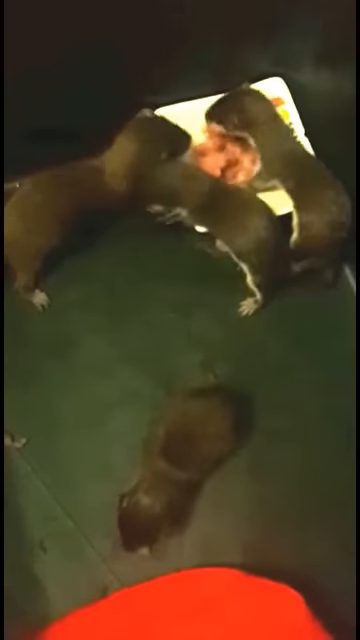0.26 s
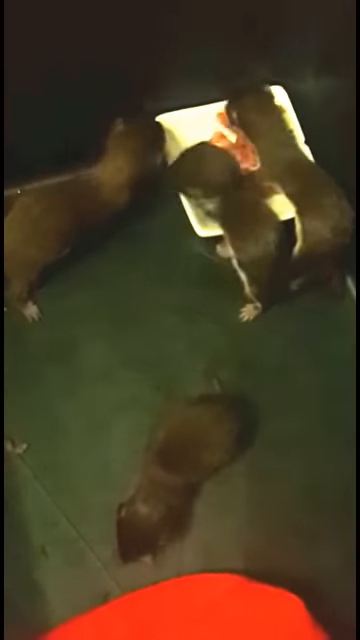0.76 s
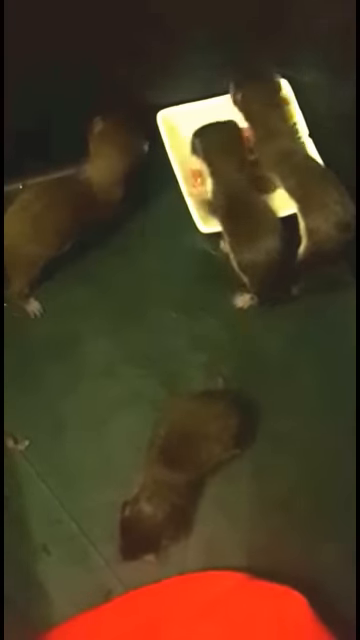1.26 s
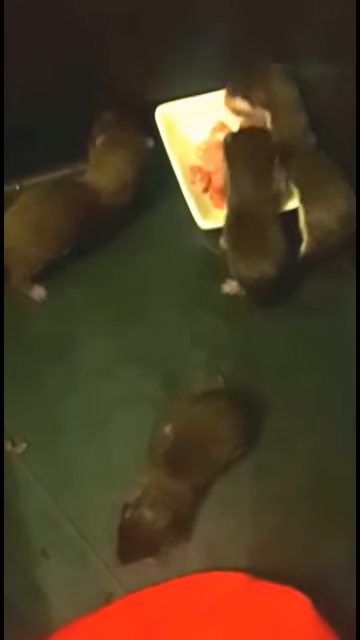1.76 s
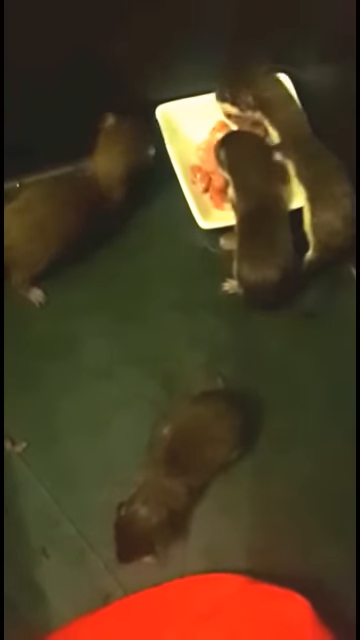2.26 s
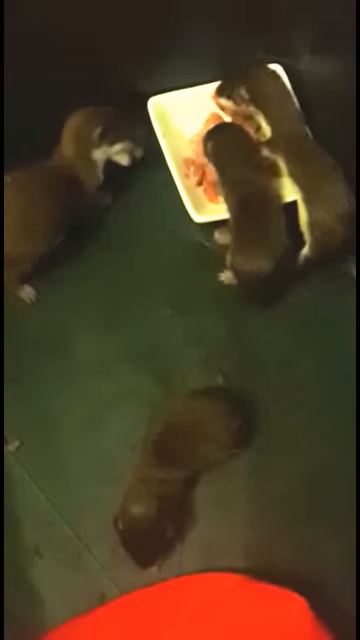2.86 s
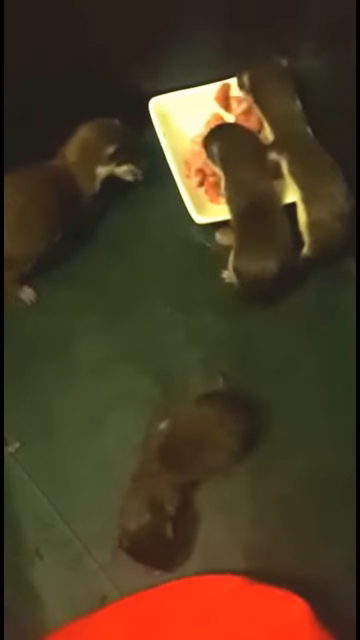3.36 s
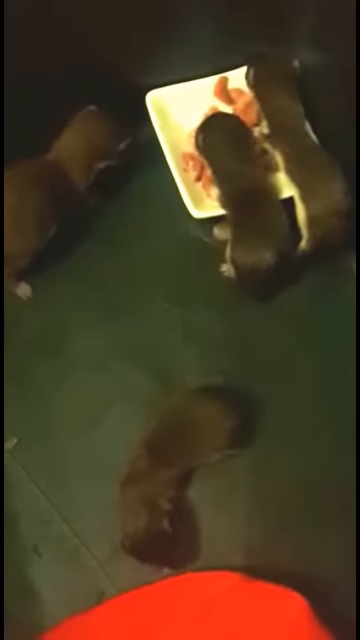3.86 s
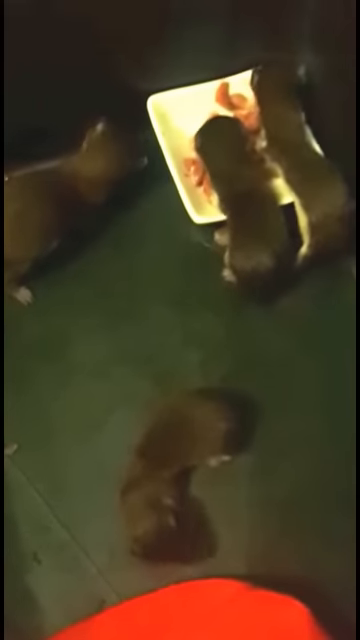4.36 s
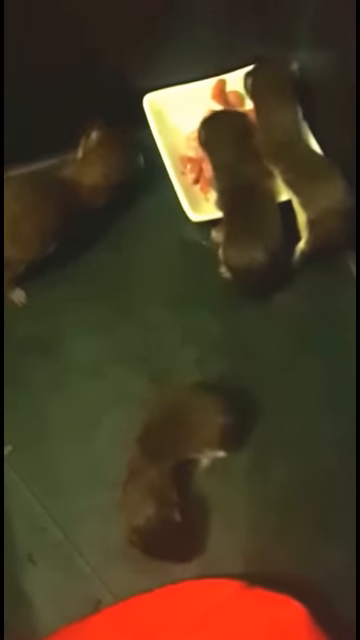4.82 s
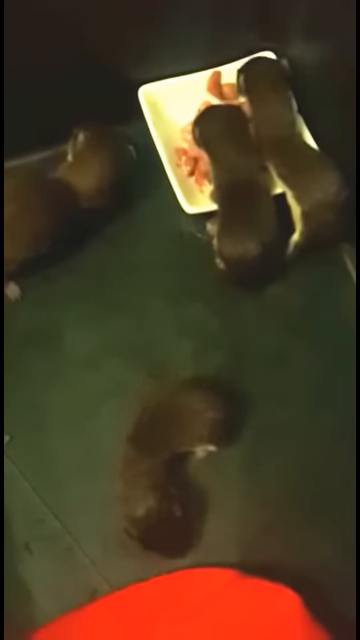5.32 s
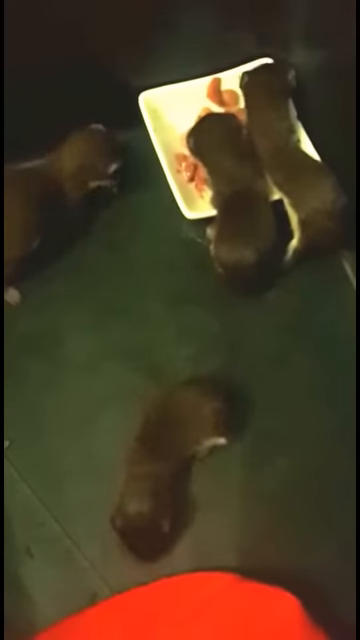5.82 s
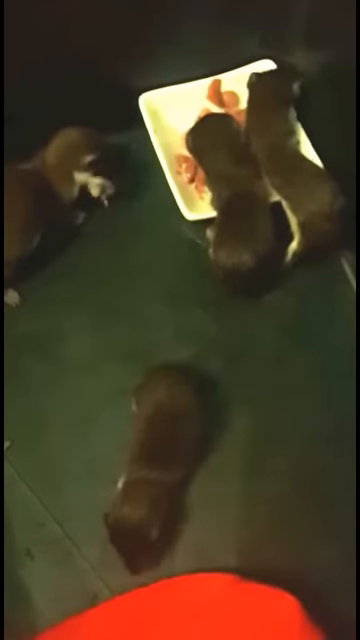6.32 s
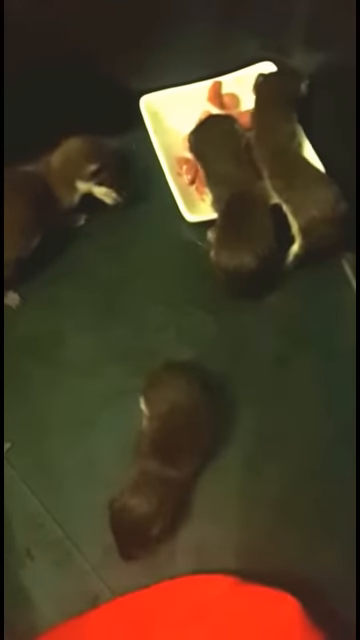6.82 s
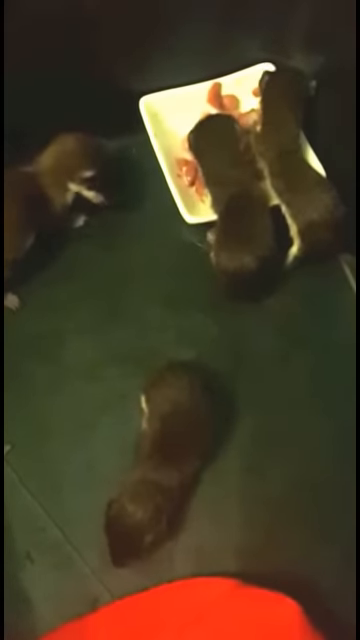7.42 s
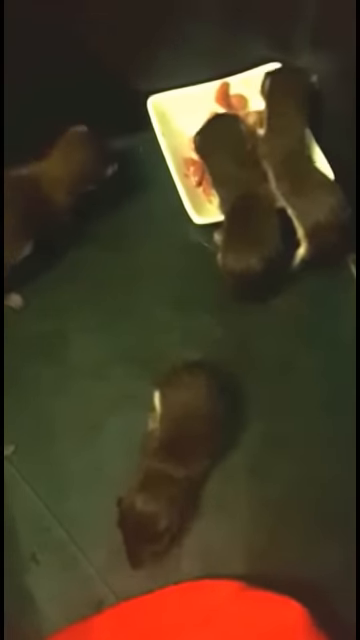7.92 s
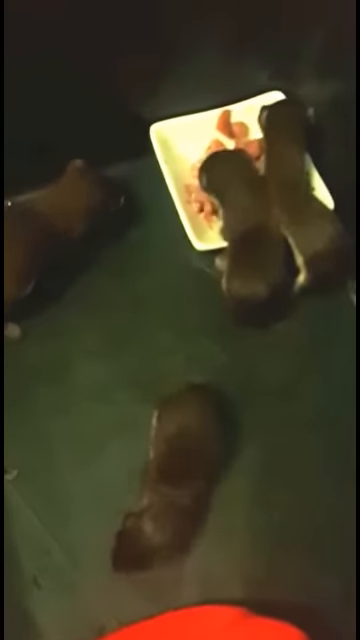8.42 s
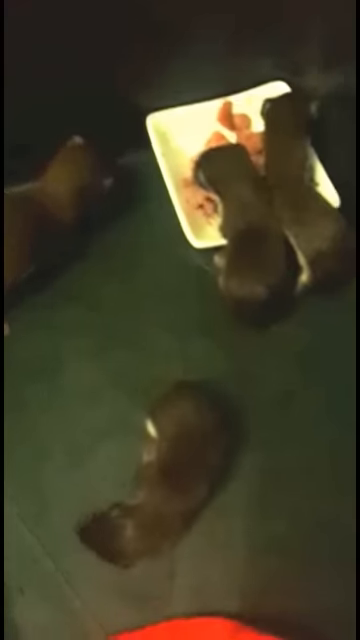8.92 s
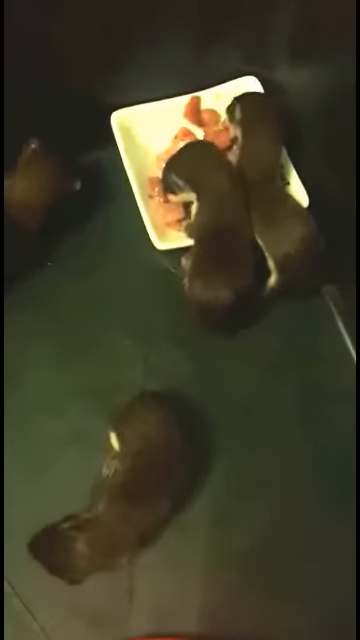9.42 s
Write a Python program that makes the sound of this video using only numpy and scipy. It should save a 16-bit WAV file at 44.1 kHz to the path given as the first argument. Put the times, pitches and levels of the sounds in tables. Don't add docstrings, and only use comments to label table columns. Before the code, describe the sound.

Small animals squeal sharply over a meal, then settle into wet smacking and nibbling, with claw ticks and paw thumps on a hollow floor.

```python
import sys
import numpy as np
from scipy import signal
from scipy.io import wavfile
from scipy.ndimage import uniform_filter1d

SR = 44100
rng = np.random.default_rng(int(sys.argv[2]) if len(sys.argv) > 2 else 0)


def generate_wav(sig):
    pcm = np.round(np.clip(np.atleast_2d(sig).T, -1, 1) * 32767).astype(np.int16)
    wavfile.write(sys.argv[1], SR, pcm)


def how_loud(loudness_db):
    steps = np.asarray(loudness_db, float) / 20
    return 10 ** steps


N = 426885

# start_s, peak_db, mouth_hz
MOUTH_SMACKS = [(0.0353, -32, 7340), (0.0954, -42, 9600), (0.1306, -35.5, 6800), (0.3403, -36.5, 5850),
                (0.5344, -36.5, 5300), (0.556, -35.5, 5900), (0.616, -35.5, 7040), (0.633, -30.5, 6100),
                (0.766, -37, 6650), (0.8879, -36.5, 5470), (0.9068, -38, 6430), (0.971, -37, 9400),
                (1.043, -43, 6900), (1.0565, -39.5, 6460), (1.2318, -43.5, 6900), (1.2488, -38.5, 7630),
                (1.3138, -49, 6770), (1.3714, -40.5, 5250), (1.485, -46.5, 6950), (1.5561, -54.5, 5730),
                (1.59, -44.5, 9100), (1.715, -49, 6500), (1.8499, -38, 7000), (1.92, -52.5, 6700),
                (2.1056, -55.5, 7050), (2.166, -62, 4610), (2.272, -56, 5430), (2.2764, -49.5, 7400),
            (2.633, -59.5, 7340), (2.71, -53.5, 9650), (2.843, -43, 7600), (2.8851, -41.5, 8860),
            (2.963, -58, 5840), (2.9818, -51.5, 7540), (3.059, -56, 5900), (3.147, -49, 9300),
            (3.227, -48, 7470), (3.266, -50, 6030), (3.3502, -49, 9540), (3.4427, -54.5, 6970),
            (3.514, -44, 7400), (3.549, -61.5, 5320), (3.909, -53.5, 7070), (4.006, -62, 4620),
            (4.123, -57, 7000), (4.2101, -43.5, 4790), (4.337, -50, 5270), (4.3482, -45, 5770),
            (4.631, -60.5, 4050), (4.7446, -56, 6240), (4.7573, -50, 5080), (4.801, -67, 4660),
                (4.959, -53, 6140), (4.983, -52, 6100), (5.018, -50, 8080), (5.0475, -38.5, 6900),
           (5.3092, -49, 7080), (5.326, -47.5, 9310), (5.399, -48.5, 6160), (5.5, -50.5, 9200),
           (5.5387, -49.5, 9200), (5.6042, -47.5, 6600), (5.691, -57.5, 4540), (5.738, -52.5, 5140),
           (5.842, -49.5, 6860), (5.8553, -52, 5300), (5.929, -56.5, 6160), (6.024, -52.5, 8760),
           (6.12, -50, 6600), (6.168, -43, 4760), (6.223, -41.5, 8150), (6.3703, -53, 5560),
           (6.393, -44, 4800), (6.4972, -61, 6930), (6.601, -51.5, 7200), (6.723, -55.5, 6080),
           (6.7958, -45, 5560), (6.931, -51.5, 6330),
                (7.08, -49.5, 5530), (7.1166, -38, 4430), (7.2144, -50, 5000), (7.241, -50, 5460),
           (7.3531, -49.5, 7140), (7.44, -53.5, 8800), (7.565, -55.5, 7100), (7.6412, -50, 5460),
           (7.7827, -53, 6090), (7.917, -56.5, 8770), (7.96, -47.5, 5600), (7.994, -54.5, 6000),
           (8.201, -55.5, 5100), (8.3864, -40, 4940), (8.445, -49.5, 7400), (8.5854, -53.5, 5160),
           (8.678, -50, 7500), (8.7454, -39, 5270), (8.7646, -47, 7300), (8.812, -45, 7000),
           (9.0462, -43, 7000), (9.1125, -34.5, 4200), (9.3164, -50.5, 4790), (9.6269, -54, 5680),
           (9.6426, -44.5, 7800), (9.664, -37.5, 6000)]
BITES = MOUTH_SMACKS
# start_s, peak_db
BLOWS = [(0.003, -47.5), (0.062, -41.5), (0.951, -42.5), (0.977, -63), (1.135, -54), (1.253, -66.5),
         (1.521, -45), (1.662, -60.5), (2.755, -67.5), (2.974, -65), (3.027, -53.5), (3.071, -60),
         (3.174, -64.5), (3.235, -56.5), (4.165, -70), (5.001, -66.5), (6.219, -68), (6.736, -63),
         (6.988, -50.5), (7.2003, -53), (7.405, -58), (7.46, -66), (7.617, -60), (7.851, -60), (7.905, -63),
         (8.057, -54), (8.276, -42), (8.2866, -50), (8.295, -45), (8.42, -63), (8.52, -63), (8.745, -64),
         (9.11, -63), (8.494, -58), (8.702, -61), (8.836, -58), (9.067, -60), (9.374, -58.5)]


def evened(x):
    return x / np.sqrt(np.mean(x ** 2) + 1e-20)


def peaked(x):
    return x / abs(x).max()


def wander(shape, size):
    return evened(uniform_filter1d(rng.standard_normal(shape), size=size))


def read(points, hz):
    f, value = np.transpose(points)
    return np.interp(np.log(hz + 1), np.log(f + 1), value)


def add(mix, s, sound):
    part = mix[..., round(s * SR):][..., :sound.shape[-1]]
    part += sound[..., :part.shape[-1]]


def band(x, lo_hz, hi_hz, order=2):
    return signal.sosfilt(signal.butter(order, [lo_hz, min(hi_hz, .49 * SR)], "band", fs=SR, output="sos"), x)


def panned(x, pan_db):
    return x * how_loud(np.array([[.5], [-.5]]) * pan_db)


def walls(x, wet_db, early_db, lag=7):
    # pitch_hz, t60_s
    wall_decay = [(300, 0.15), (2000, 0.19), (5000, 0.24), (10000, 0.018), (16000, 0.014)]
    size = SR // 3
    slots = np.arange(120, size - 20, 20)
    at = slots + rng.integers(0, 20, (2, len(slots)))
    taps = np.zeros((2, size))
    np.put_along_axis(taps, at, rng.choice([-1., 1.], at.shape), 1)
    hz, t, z = signal.stft(taps, SR, nperseg=128)
    fade = how_loud(-60 * t / read(wall_decay, hz)[:, None])
    tail = signal.istft(z * fade, SR, nperseg=128)[1][:, :size]
    response = how_loud(wet_db) * tail / np.linalg.norm(tail, axis=1, keepdims=True)

    early = rng.integers(20, 190, (2, 5))
    echoes = how_loud(early_db - early / 14) * rng.choice([-1., 1.], early.shape)
    np.put_along_axis(response, early, echoes, 1)
    response[0, 0] += 1
    response[1, lag] += 1
    response /= np.linalg.norm(response, axis=1, keepdims=True)
    return signal.fftconvolve(x, response, axes=1)[:, :N]


def squeak(rows, shake, rasp_db, step_db, flutter_db):
    s, *columns = np.transpose(rows)
    t = np.arange(s[0], s[-1], 1 / SR)
    hz, effort_db, mouth = (uniform_filter1d(np.interp(t, s, c), size=90) for c in columns)
    pitch_wobble, level_wobble = (wander(len(t), 80) for _ in range(2))
    turns = np.cumsum(hz * (1 + shake * pitch_wobble)) / SR
    tone = np.zeros(len(t))
    for k in range(1, 7):
        level = how_loud(effort_db + step_db * (k - 1.5)) * (hz * k < 16000)
        mouth_gain = 1 / np.hypot(1, (k * hz - mouth) / 440)
        tone += level * mouth_gain * np.sin(2 * np.pi * k * turns)
    air = how_loud(effort_db + rasp_db) * band(rng.standard_normal(len(t)), 2400, 8900, order=3)
    voice = np.sqrt(2) * tone * how_loud(flutter_db * level_wobble) + air
    return s[0], voice * signal.windows.tukey(len(t), 130 / len(t))


def squeaks():
    # time_s, pitch_hz, effort_db, mouth_hz
    chirp = [(0.038, 4570, -34, 4630), (0.041, 4186, -32, 4600), (0.049, 3974, -37, 5380),
             (0.057, 4130, -29.5, 5000), (.068, 4500, -30, 5400), (.085, 4620, -30.5, 6100),
             (.105, 4646, -30.5, 5930), (.121, 4410, -34, 4700), (.129, 3900, -36.5, 4540),
             (.136, 2800, -34, 3900)]
    screech = [(0.2443, 3106, -32, 5660), (.249, 3140, -21, 5400), (0.2534, 3063, -29, 4324),
               (0.2577, 2950, -22.5, 5790), (.263, 2887, -33.5, 5800), (0.268, 2823, -36.5, 5560),
               (.272, 2846, -28.5, 5700), (.28, 3080, -38, 6150), (0.295, 3110, -37, 6280)]
    answer = [(.251, 2494, -45.5, 2193), (.255, 1804, -42, 1923), (0.271, 1982, -38.5, 1980),
              (0.279, 2057, -30, 3503), (.293, 2083, -24, 3820), (0.297, 2540, -26, 2720),
              (.302, 2730, -27.5, 2676)]
    peep = [(.447, 4800, -47.5, 5000), (.455, 4910, -28.5, 5065), (.463, 5174, -27.5, 5200),
            (0.472, 5000, -15, 5006), (0.478, 4880, -24, 4870), (.486, 4710, -21, 4756),
            (0.4924, 4540, -32, 4490), (.496, 3500, -41, 4220)]
    wail = [(0.769, 3400, -32.5, 5400), (.776, 3740, -29.5, 5700), (.787, 3840, -27.5, 5900),
            (0.798, 3530, -32, 5600), (.807, 3143, -27, 6000), (0.817, 3124, -37.5, 5900),
            (0.828, 3180, -29.5, 5700), (0.837, 3012, -27.5, 4200), (.843, 2475, -22, 2900),
            (0.849, 1694, -38.5, 1900)]
    # left_right_db, wall_tail_db, pitch_shake (share), rasp_db, step_db per partial, flutter_db
    places = [
        (-3, -15, 0.0012, -27.5, -0.5, 2.5),
        (3, -11.5, .016, -8, -2.5, 4),
        (0, -17.5, 0.004, -13.5, -0.5, 1.5),
        (5.5, -9, .0005, -38.5, 1.5, 1.24),
        (3.5, -23, .0015, -34, -5, 2.5),
    ]
    lags = [10, 8, 3, 11, 13]
    out = np.zeros((2, N))
    for rows, lag, (pan_db, wet_db, *voicing) in zip([chirp, screech, answer, peep, wail], lags, places):
        close = np.zeros((2, SR + SR // 4))
        s, voice = squeak(rows, *voicing)
        add(close, s, panned(voice, pan_db))
        add(out, 0, walls(close, wet_db, early_db=-7.5, lag=lag))
    return out


def burst(t60, clump_db, rise=0.00066):
    t = np.arange(1500) / SR
    clumps = how_loud(clump_db * np.minimum(rng.exponential(1, len(t)), 4))
    spikes = rng.standard_normal(len(t)) * clumps
    return spikes * how_loud(-60 * t / np.clip(t60, .003, .3)) * np.minimum(t / rise, 1) ** 2


def smack(db, hz, smear):
    drive = burst(.009 + .011 * smear, clump_db=2.5, rise=.0003 + .002 * smear)
    body = band(drive, hz / 1.31, hz * 1.204) + 0.57 * band(drive, hz / 2.72, hz * 1.93)
    edge = band(drive, 9600, 17000)
    octaves = np.log2(hz / 7340)
    edge_db = -18 + 5 * octaves + 2.5 * rng.standard_normal()
    sound = peaked(body) + how_loud(edge_db) * peaked(edge)
    return panned(how_loud(db + 6.0) * sound, 0.5 - 6 * octaves)


def smacks():
    # start_s, peak_db, mouth_hz
    further_smacks = [(0.354, -40, 10600), (0.387, -45.5, 11600), (0.7346, -48.5, 6100), (6.163, -60, 6500),
                              (6.999, -56, 6200), (7.016, -59, 4600), (7.036, -54, 7040), (8.246, -55.5, 5300),
                              (8.326, -53.5, 5400), (8.541, -52.5, 4900), (8.906, -51, 6800), (9.129, -43, 6440),
                              (9.204, -47.5, 4800), (9.296, -52, 9100), (9.424, -57.5, 5530),
                              (1.0074, -55.5, 4920), (1.1747, -55.5, 8740), (1.2897, -55, 8000), (1.6563, -59, 6390),
                      (1.877, -50.5, 5300), (2.0178, -54.5, 6070), (2.0484, -56.5, 7360), (2.1194, -50, 5700),
                      (2.1314, -56.5, 7670), (2.141, -63, 4650), (2.4184, -61.5, 4680), (2.4466, -60, 4640),
                      (2.6424, -54.5, 6620), (3.0967, -55, 9300), (3.1044, -64, 4650), (3.2763, -55, 6120),
                      (4.1798, -57.5, 4190), (4.4572, -58.5, 7000), (4.5814, -58, 4910), (4.8589, -56, 7470),
                      (4.8744, -65, 4660), (5.0844, -56, 4700), (5.621, -54, 7000), (5.7217, -54, 5160),
                      (5.948, -66, 4680), (6.252, -54.5, 7020), (7.369, -57, 4500), (7.6014, -56, 6920),
                      (7.827, -59, 4700), (7.867, -60, 4700), (8.02, -57, 5430), (8.152, -57.5, 4700),
                      (8.505, -55, 5210)]
    # start_s, peak_db
    snaps = [(1.0432, -52), (1.0562, -39), (1.2325, -37), (1.4847, -50), (1.5905, -38), (1.7147, -41),
             (1.799, -50), (1.8407, -45), (2.1058, -43), (2.8426, -51.5), (3.147, -47.5), (3.2268, -57),
             (5.048, -40), (5.326, -42), (5.6039, -43), (6.0249, -52.5), (6.1202, -47.5), (7.0805, -41.5),
             (7.1159, -48), (7.6417, -45), (9.1124, -60)]
    lags = [7, 9, 2]
    mouths = np.zeros((3, 2, N))
    for k, (s, db, hz) in enumerate(BITES + further_smacks):
        smear = np.clip((-42 - db) / 12, 0, 1)
        add(mouths[k % 3], max(s - 0.0009 * smear, 0), smack(db, hz, smear))
    for k, (s, db) in enumerate(snaps):
        snap = band(burst(0.014, clump_db=4.0), 7000, 15000)
        add(mouths[k % 3], s, panned(how_loud(db + 2.5) * peaked(snap), 1.5))
    return sum(walls(m, wet_db=-14, early_db=-1, lag=lag) for m, lag in zip(mouths, lags))


def squelches():
    # centre_s, rms_db
    long_ones = [(.64, -56), (1.07, -58.5), (1.323, -60), (1.562, -60.5), (1.725, -59), (1.812, -59),
                 (2.29, -61), (3.19, -66), (3.667, -64), (4.129, -69.5), (4.56, -62.5), (5.174, -63),
                 (6.071, -64), (6.286, -61), (6.517, -60.5), (6.994, -68), (7.135, -53.5), (7.569, -67),
                 (7.999, -66), (8.453, -63), (8.69, -64), (8.912, -62)]
    length_s = .055
    count = round(length_s * SR)
    mouths = np.zeros((2, 2, N))
    after = [(s + 0.014, -78 + 0.3 * (db + 51)) for s, db, _ in BITES]
    for k, (s, db) in enumerate(long_ones + after):
        clumps = how_loud(4 * wander(count, 120))
        fizz = rng.standard_normal(count) * how_loud(3 * rng.exponential(1, count)) * clumps
        hz = 7100 * rng.uniform(.92, 1.05)
        sound = band(fizz, hz / 1.15, hz * 1.15) + .6 * band(fizz, 3600, 9500)
        swell = how_loud(db - 1.0) * evened(sound) * np.hanning(count)
        add(mouths[k % 2], max(s - length_s / 2, 0), panned(swell, 0.71))
    return sum(walls(m, wet_db=-20.0, early_db=-1.5) for m in mouths)


def crackles():
    t = np.arange(N) / SR
    starts = np.sort([-1] + [row[0] for row in BITES])
    since = t - starts[np.searchsorted(starts, t) - 1]
    pops_per_s = 8 + 70 * np.exp(-since / .06)
    size = how_loud(-63 + 3 * np.minimum(rng.exponential(1, N), 3))
    pops = size * (rng.random(N) < pops_per_s / SR)
    kind = rng.integers(0, 5, N)
    out = np.zeros(N)
    for k, hz in enumerate(np.geomspace(2600, 6500, 5)):
        pop = band(burst(.005, clump_db=2.5), hz, hz * 2.2)
        out += signal.oaconvolve(pops * (kind == k), peaked(pop))[:N]
    return walls(panned(out, 0.5), wet_db=-19.5, early_db=2.5)


def ticks():
    # start_s, peak_db
    tray_ticks = [(0.016, -47), (1.061, -44), (1.357, -51), (1.517, -47), (3.719, -51), (4.005, -52),
                  (4.208, -56), (4.289, -53), (4.565, -53), (4.826, -53.5), (5.147, -54.5), (5.471, -51.5),
                  (5.8, -53), (6.133, -53.5), (6.394, -50.5), (6.497, -48.5), (6.57, -53), (7.014, -51),
                  (7.118, -41), (8.276, -33), (8.2785, -38), (8.2875, -46), (9.052, -50), (9.317, -52)]
    claws = [(s, -50 + 0.7 * (db + 51)) for s, db in BLOWS]
    tray_hz = 1800
    out = np.zeros(N)
    for s, db in tray_ticks + claws:
        drive = burst(.005, clump_db=1.5)
        sound = band(drive, 700, 3300, order=3) + 1.3 * band(drive, tray_hz / 1.12, tray_hz * 1.12)
        add(out, s, how_loud(db + 5.0) * peaked(sound))
    return walls(np.array([out, out]), wet_db=-18, early_db=-9)


def floor_ring(t):
    # pitch_hz, level_db, t60_s
    modes = [(82.5, -19.5, 0.2656), (109.3, -14, 0.29), (173, -4.5, 0.27), (205, -9, 0.16),
             (235.5, -0.5, 0.077), (276, -3.5, 0.19), (383, -6, 0.057), (537, -8, 0.062), (634, -13, 0.059),
             (785, -15, 0.038)]
    spot_db, detune, phase = rng.standard_normal((3, len(modes))) * [[2.], [.015], [.5]]
    sag = t + 0.0016 * (1 - np.exp(-t / 0.054))
    ring = np.zeros(len(t))
    for k, (hz, level_db, t60) in enumerate(modes):
        swing = np.sin(2 * np.pi * hz * (1 + detune[k]) * sag + phase[k])
        ring += (-1) ** k * how_loud(level_db + spot_db[k] - 60 * t / t60) * swing
    choke = how_loud(-3.5 * (t / 0.12) ** 2)
    return band(ring * np.minimum(t / 0.0016, 1) * choke, 80, 2200, order=3)


def blows():
    boom, slap = np.zeros((2, N))
    t = np.arange(SR // 4) / SR
    for s, db in BLOWS:
        crack = band(burst(0.025, clump_db=-16.0), 210, 920)
        add(boom, s, how_loud(db + 5.5) * peaked(floor_ring(t)))
        add(slap, s, how_loud(db + 4.5) * peaked(crack))
    late = np.concatenate([np.zeros(8), boom])[:N]
    return panned(np.array([boom, late]), -1.2) + walls(np.array([slap, slap]), wet_db=-9, early_db=-5)


def bumps():
    # start_s, peak_db, pitch_hz
    touches = [
        (8.866, -42.5, 293),
        (8.973, -36, 217),
    ]
    out = np.zeros((2, N))
    for s, db, hz in touches:
        u = np.arange(0, 3, hz / SR)
        push = -np.sin(2 * np.pi * u) * np.sin(np.pi * np.minimum(u, 1)) ** .5
        add(out[1], s, how_loud(db) * band(push * (u < 1), 98, 1100))
    return out


def scuffle():
    # time_s, level_db
    pushes = [(0, -62.5), (.25, -73), (.6, -72), (.85, -73), (1.1, -82), (1.6, -84.5), (1.85, -75.5),
              (2.098, -100), (6.3, -100), (6.4, -67.5), (6.5, -100)]
    slips = how_loud(4 * wander((2, N), 500))
    scrape = band(rng.standard_normal(N) * slips[0], 370, 810)
    thud = band(rng.standard_normal(N) * slips[1], 90, 250)
    level_db = np.interp(np.arange(N) / SR, *np.transpose(pushes))
    return how_loud(level_db) * evened(scrape + .5 * thud)


def rustle():
    # time_s, level_db
    brushing = [(0, -56.5), (.2, -64), (.35, -74.5), (.5, -56), (.7, -68), (1.0, -63.5), (1.3, -77),
                (1.8, -72), (2.3, -86), (2.6, -100)]
    lumps = wander((2, N), 3000)
    fur_db = np.interp(np.arange(N) / SR, *np.transpose(brushing)) + 0.84 * lumps[0]
    fur = how_loud(fur_db) * evened(band(rng.standard_normal((2, N)), 1780, 15400))
    handling = how_loud(-89 + 4 * lumps[1]) * evened(band(rng.standard_normal(N), 65, 190))
    return fur + handling


def rumble():
    # low_hz, high_hz, level_db
    bands = [(34, 43, -91), (70, 95, -93), (6990, 7170, -87)]
    return sum(how_loud(db) * evened(band(rng.standard_normal(N), lo, hi)) for lo, hi, db in bands)


def hiss():
    # pitch_hz, density_db per Hz
    colour = [(40, -50), (60, -24), (200, -14), (330, -20), (460, -19), (2200, -25), (3800, -24.5),
              (4600, -20.5), (5200, -20.5), (7100, -20), (8300, -23.5), (11000, -25.5), (14400, -23),
              (15450, -24), (15900, -42)]
    # pitch_hz, likeness (0 to 1)
    likeness = [(30, 0.57), (130, 0.44), (300, 0.46), (1000, 0.26)]
    # pitch_hz, level_db
    whine = [(4648, -82.5), (7078, -92), (14440, -95)]
    frames, hz = N // 512 + 5, np.fft.rfftfreq(2048, 1 / SR)
    a, b, c, d, patches = rng.standard_normal((frames, 1025, 5)).T
    patches = uniform_filter1d(patches, size=20, axis=0)
    patches = evened(uniform_filter1d(patches, size=6, axis=1))
    same = np.clip(read(likeness, hz), 0, 1)[:, None]
    left = a + 1j * b
    right = same * left + np.sqrt(1 - same ** 2) * (c + 1j * d)
    z = np.array([left, right]) * how_loud(read(colour, hz)[:, None] + 0.544 * patches)
    noise = signal.istft(z, nperseg=2048, noverlap=1536)[1][:, :N]
    drift = 1 + .0003 * wander(N, 20000)
    tones = sum(how_loud(db) * np.sin(2 * np.pi * np.cumsum(f * drift) / SR) for f, db in whine)
    return how_loud(-70.4) * evened(noise) + panned(tones, 6.0)


def scene():
    animals = squeaks() + smacks() + squelches() + crackles()
    pen = ticks() + blows() + scuffle() + rustle()
    return animals + pen + bumps() + rumble() + hiss()


def low_pass(x):
    return signal.sosfilt(signal.butter(12, 16650, fs=SR, output="sos"), x)


def record(dry):
    edge = signal.firwin(255, 16300, window=("kaiser", 9), fs=SR)
    mix = signal.oaconvolve(dry, edge[None], "same") - .0002
    return low_pass(mix)


dry = scene()
out = record(dry)
generate_wav(out)
```